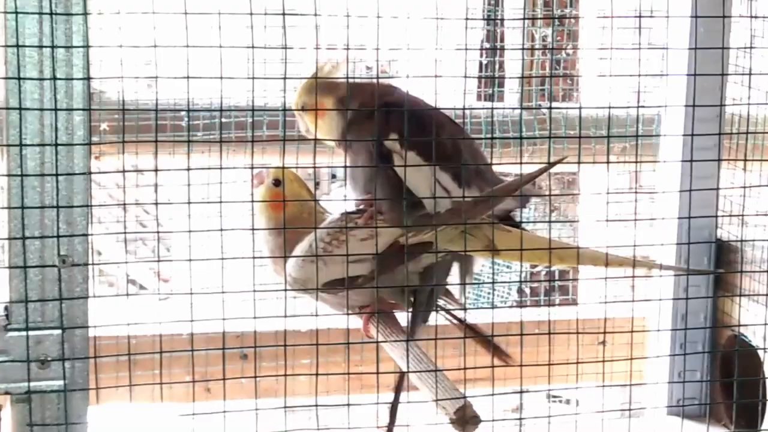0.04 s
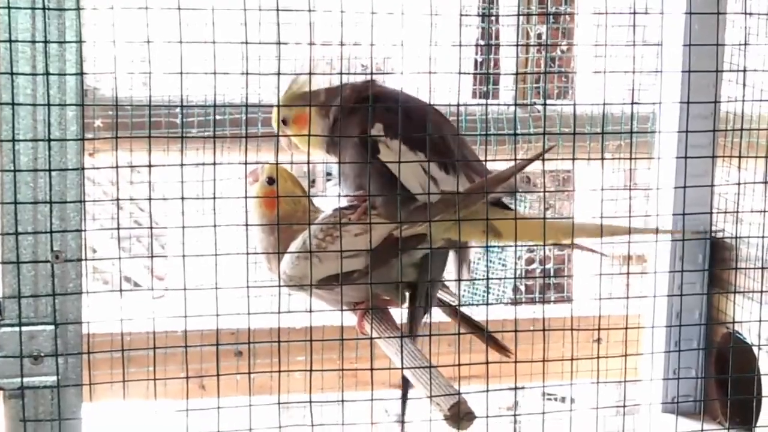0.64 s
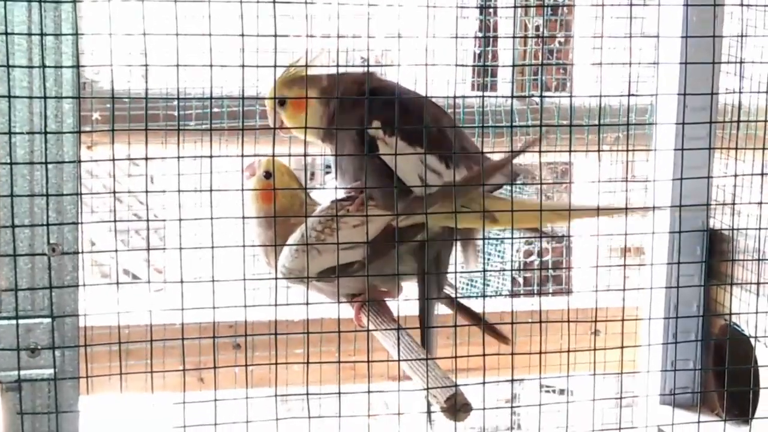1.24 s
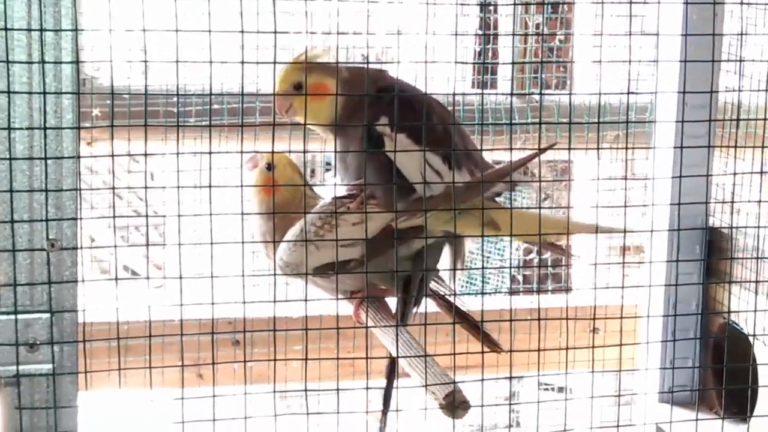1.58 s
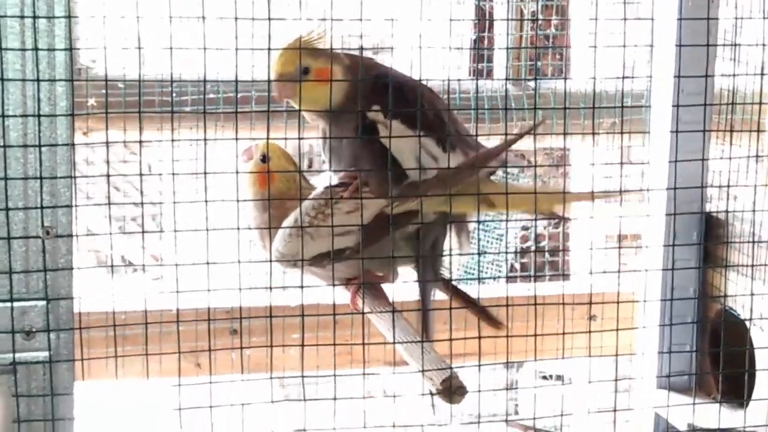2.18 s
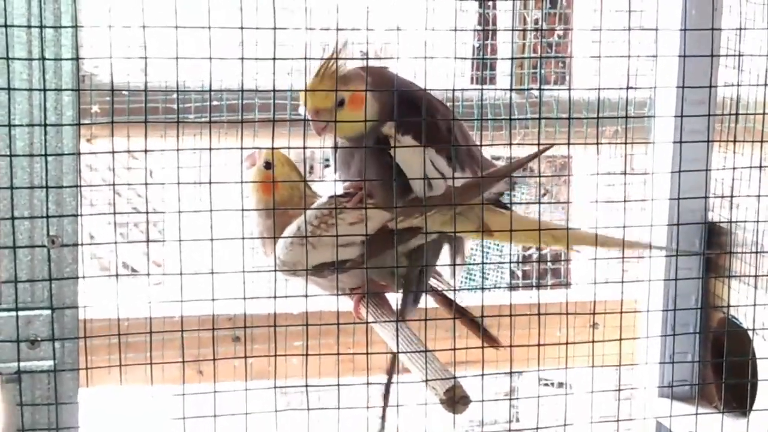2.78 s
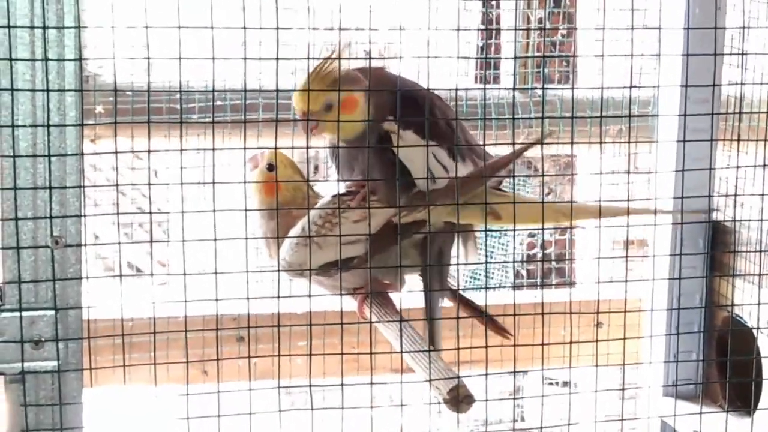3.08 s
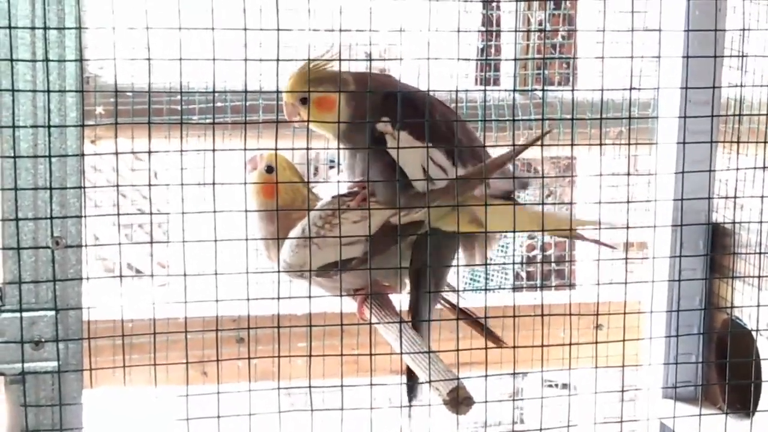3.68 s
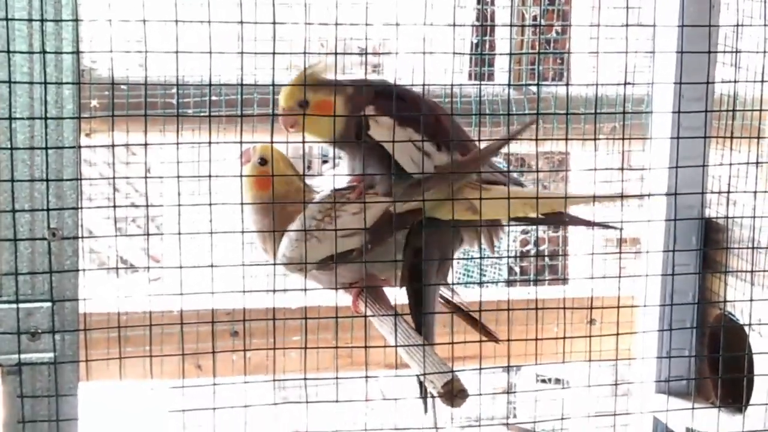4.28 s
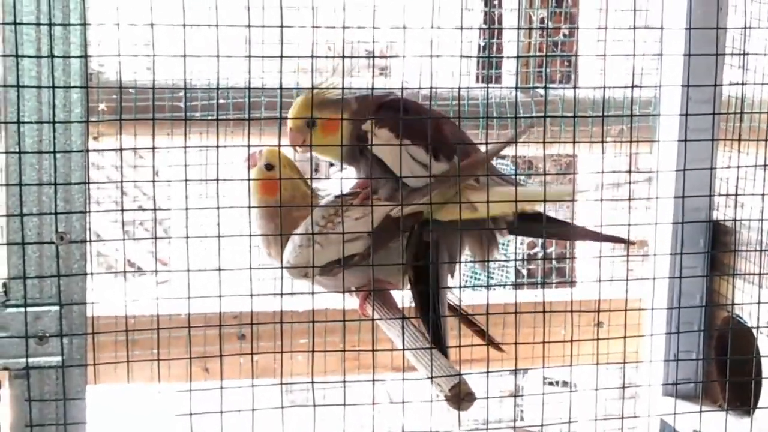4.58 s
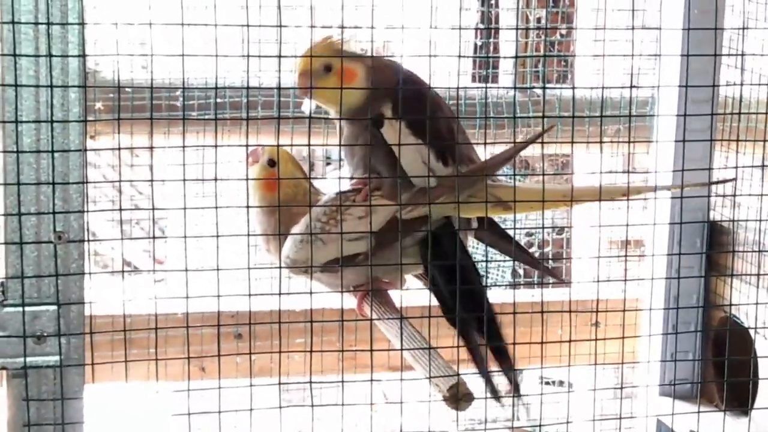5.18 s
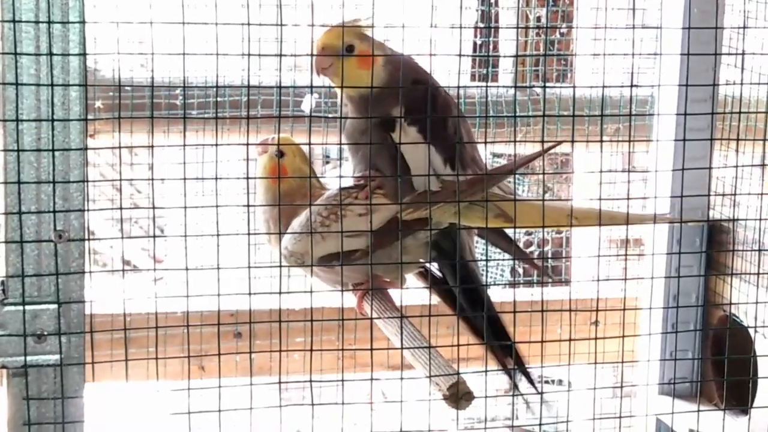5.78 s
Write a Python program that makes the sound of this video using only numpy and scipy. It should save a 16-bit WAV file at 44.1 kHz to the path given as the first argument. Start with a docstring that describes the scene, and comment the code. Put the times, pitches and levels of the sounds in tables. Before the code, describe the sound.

Cockatiels chirp, whine and hiss softly in an aviary, then break into loud whistles and harsh squawks while a distant hen moans.

```python
"""Soft chirps, whines and hisses, then close whistles, a burst of chips and harsh squawks:
cockatiels chattering in a wire aviary, whose hard walls answer each call. Further off a hen
draws out long moans over a faint outdoor rumble. Each voice is a syrinx, a harmonic stack that
shakes as it turns rough; hisses are unvoiced air. A small camera's limiter holds the peaks down."""
import sys
import numpy as np
from scipy import signal
from scipy.fft import rfft, irfft, next_fast_len
from scipy.io import wavfile
from scipy.ndimage import uniform_filter1d, minimum_filter1d, map_coordinates

SR = 44100
rng = np.random.default_rng(int(sys.argv[2]) if len(sys.argv) > 2 else 0)


def write(x):
    x = np.atleast_2d(x).T
    wavfile.write(sys.argv[1], SR, np.round(np.clip(x, -1, 1) * 32767).astype(np.int16))

N = 266364

PROGRESS = np.linspace(0, 1, 41)  # position within a call
# Chirp harmonics, first up: level/dB
CHIRP_HARMONICS_DB = [3.5, 11.5, -16, -21.5, -22, -29, -27.5, -52.5]
# Broadband noise that swells and fades with each call: f/Hz, level/dB
CALL_NOISE_SPECTRUM = [(60, -17), (200, -11.5), (600, -13.5), (1500, -10), (2600, -5.5), (3600, 4),
                       (5200, 1.5), (8000, -9.5), (14000, -14.5)]


def amp(db):
    """Decibels to gain."""
    return 10 ** (np.asarray(db) / 20)


def unit(x):
    """Scale to rms 1."""
    return x / np.sqrt(np.mean(x ** 2) + 1e-20)


def along(points, hz):
    """Read (f/Hz, value) points on a log frequency axis."""
    knots_hz, values = np.transpose(points)
    return np.interp(np.log(hz + 1), np.log(knots_hz + 1), values)


def wobble(rate_hz, n):
    """Smooth random curve of n samples, rate_hz knots a second."""
    knots = rng.standard_normal(int(n * rate_hz / SR) + 4)
    return map_coordinates(knots, [np.arange(n) * rate_hz / SR])


def filtered(x, response):
    """Apply the gain response(hz)."""
    n = x.shape[-1]
    size = next_fast_len(n + 8192)
    return irfft(rfft(x, size) * response(np.fft.rfftfreq(size, 1 / SR)), size)[..., :n]


def noise(spectrum, channels=1):
    """Coloured noise, rms 1."""
    white = rng.standard_normal((channels, N))
    return unit(filtered(white, lambda hz: amp(along(spectrum, hz))))


def spread(pair, coherence):
    """Mix two unrelated signals to left and right of a given coherence."""
    def weights(hz):
        angle = np.arccos(np.clip(along(coherence, hz), -1, 1)) / 2
        return np.array([np.cos(angle), np.sin(angle)])
    mid, side = filtered(pair, weights)
    return np.array([mid + side, mid - side])


def hump(crest, first, top, last):
    """Two half parabolas, first to top to last, joined at crest (0-1)."""
    crest = np.clip(crest, .05, .95)
    away = PROGRESS - crest
    before = (first - top) * (away / crest) ** 2
    after = (last - top) * (away / (1 - crest)) ** 2
    return top + np.where(away < 0, before, after)


def controls(start_s, length_s, *columns):
    """One call as rows of t/s and the given columns."""
    return np.column_stack(np.broadcast_arrays(start_s + length_s * PROGRESS, *columns))


def gesture(rows, fade_s):
    """Sample indices, soft gate and per-sample control curves of one call."""
    times, *columns = np.transpose(rows)
    index = np.arange(max(int((times[0] - fade_s) * SR), 0), min(int((times[-1] + fade_s) * SR), N))
    t = index / SR
    ramp = np.clip(np.minimum(t - times[0], times[-1] - t) / fade_s + 1, 0, 1)
    return index, np.sin(ramp * np.pi / 2) ** 2, [np.interp(t, times, column) for column in columns]


def arch(row, rise_db, fall_db, fray=0, dulling_db=0):
    """Note that bends once, swells and sinks; fray roughens its ends, dulling fades its overtones."""
    start_s, length_s, first_hz, middle_hz, last_hz, crest, db, rough, *colour_db = row
    pitch_hz = np.polyval(np.polyfit([0, .5, 1], [first_hz, middle_hz, last_hz], 2), PROGRESS)
    level_db = db + hump(crest, -rise_db, 0, -fall_db)
    if colour_db:
        colour_db[0] += dulling_db * (.5 - PROGRESS)
    return controls(start_s, length_s, pitch_hz, level_db, rough + hump(crest, fray, 0, fray), *colour_db)


def glide(row, crest, edge_db, rough):
    """Note that slides straight between two pitches."""
    start_s, length_s, first_hz, last_hz, db = row
    pitch_hz = first_hz + (last_hz - first_hz) * PROGRESS
    return controls(start_s, length_s, pitch_hz, db + hump(crest, -edge_db, 0, -edge_db), rough)


def syrinx(calls, harmonics_db, jitter, jitter_hz, flutter_db, flutter_hz, rasp, fade_s):
    """Harmonic stack whose pitch (jitter) and level (flutter) shake with roughness.
    Call rows: t/s, f/Hz, level/dB, roughness/0-1, optionally overtones/dB, undertones/dB."""
    out = np.zeros(N)
    k = np.arange(1, len(harmonics_db) + 1)[:, None]
    strongest = np.argmax(harmonics_db) + 1
    groups = [k > strongest, k < strongest]  # overtones, undertones
    for rows in calls:
        index, gate, (pitch_hz, db, rough, *extra_db) = gesture(rows, fade_s)
        n = len(index)
        rough = np.clip(rough, .15, 1)
        tremble = rough * wobble(jitter_hz, n)
        wander = .55 * np.sqrt(rough) * wobble(jitter_hz / 3, n)
        pitch_hz = pitch_hz * (1 + jitter * (tremble + wander))
        phase = 2 * np.pi * np.cumsum(pitch_hz) / SR
        boost_db = sum(group * extra for group, extra in zip(groups, extra_db))
        strength = amp(np.array(harmonics_db)[:, None] + boost_db) * (k * pitch_hz < SR / 2)
        # Uneven cycles put a noise skirt around each harmonic.
        skirt = np.array([wobble(800, n) + 1j * wobble(800, n) for _ in harmonics_db])
        depth = rasp * rough ** 1.5
        stack = np.sum(strength * np.imag((1 + depth * skirt) * np.exp(1j * k * phase)), axis=0)
        stack /= np.sqrt(.5 + depth ** 2)
        flutter = unit(amp(flutter_db * np.sqrt(rough) * wobble(flutter_hz, n)))
        out[index] += gate * amp(db) * flutter * stack
    return out


def call_noise(call, spectrum, relative_db):
    """Broadband noise that swells and fades with a call."""
    envelope = np.sqrt(np.abs(uniform_filter1d(call ** 2, size=400)))
    return amp(relative_db) * envelope * noise(spectrum)[0]


def aviary(x, walls_db, tail_db):
    """Direct sound, early wall echoes and a short diffuse tail, in stereo."""
    # Tail decay: f/Hz, T60/s
    decay = [(300, 0.91), (1500, 0.29), (4000, 0.21), (7000, 0.2), (14000, 0.29)]
    # Echo likeness, left to right: f/Hz, coherence/0-1
    coherence = [(500, .99), (2000, .98), (4500, .88), (9000, .45), (14000, .3)]
    n = SR // 2
    hz, t, bins = signal.stft(rng.standard_normal((2, n)), SR, nperseg=256)
    bins *= amp(-60 * t / along(decay, hz)[:, None])
    tail = signal.istft(bins, SR, nperseg=256)[1][:, :n]
    tail *= 1 - np.exp(-np.arange(n) / SR / .021)  # 21 ms build-up
    walls = np.zeros((2, n))
    for channel in walls:
        delay_s = rng.uniform(.002, .035, size=30)
        channel[(delay_s * SR).astype(int)] = rng.standard_normal(size=30) * np.exp(-delay_s / .017)
    response = (amp(tail_db) * unit(tail) + amp(walls_db) * unit(walls)) / np.sqrt(n)
    return x + signal.fftconvolve(x[None], spread(response, coherence), axes=1)[:, :N]


def outdoor_air():
    """Faint rumble, gently shifting in level."""
    # Outdoor noise: f/Hz, level/dB
    spectrum = [(15, -24.5), (35, -22), (50, -2), (62, 1), (80, -9), (130, -9.5), (250, -21.5),
                (450, -22.5), (800, -18), (1600, -20), (2700, -23), (4500, -33.5), (7000, -36),
                (14500, -35)]
    # Its likeness, left to right: f/Hz, coherence/0-1
    coherence = [(40, 0.91), (130, 1), (500, 1), (4000, 1), (10000, .6)]
    drift_db = 1.5 * wobble(5, N)
    return amp(-59.5 + drift_db) * spread(noise(spectrum, channels=2), coherence)


def far_birds():
    """Chirps from the aviary's far end, mostly echo."""
    # Chirps: t/s, length/s, first f/Hz, last f/Hz, level/dB
    rows = [ (0.488, 0.031, 1600, 1580, -65), (0.616, 0.03, 1060, 937, -63),
            (1.619, 0.071, 1290, 1000, -55), (1.991, 0.035, 1225, 1217, -57.5),
            (2.099, 0.12, 1283, 1495, -52.5), (4.3, .04, 1442, 1280, -54), (5.208, 0.066, 1494, 1208, -51),
            (5.565, 0.013, 2200, 2043, -60.5)]
    notes = [glide(row, crest=.4, edge_db=1.5, rough=.55) for row in rows]
    calls = syrinx(notes, CHIRP_HARMONICS_DB, jitter=.06, jitter_hz=300,
                   flutter_db=4, flutter_hz=150, rasp=.7, fade_s=.01)
    return amp(-7) * aviary(calls, walls_db=0, tail_db=0)


def moan(curve, tone_shift):
    """Held note that sags, hoarse at both ends, its tone shifting throughout."""
    times, hz, db = np.transpose(curve)
    first_over_db, last_over_db, last_under_db = tone_shift
    length_s = times[-1] - times[0]
    t = times[0] + length_s * PROGRESS
    rough = hump(crest=.6, first=.28, top=.12, last=.3)
    overtones_db = first_over_db + (last_over_db - first_over_db) * PROGRESS
    return controls(times[0], length_s, np.interp(t, times, hz), np.interp(t, times, db),
                    rough, overtones_db, last_under_db * PROGRESS)


def hen():
    """Long, slightly hoarse moans and faint low mutters from the yard."""
    # One curve per moan: t/s, f/Hz, level/dB
    curves = [
        [(1.08, 251, -61), (1.2, 243, -57), (1.4, 244.7, -55), (1.6, 234, -63)],
        [(2.1, 278, -54), (2.2, 297, -46), (2.28, 304, -37), (2.4, 313.6, -33), (2.5, 319.6, -29),
         (2.6, 320.4, -29.5), (2.67, 312, -36), (2.76, 278, -53)],
        [(4.5, 284, -55), (4.6, 307, -53), (4.7, 317, -42), (4.78, 320, -38.5), (4.9, 323, -47),
         (5.0, 324, -50), (5.1, 312, -50), (5.28, 272, -63)],
    ]
    # Tone per moan: first overtones/dB, last overtones/dB, last undertones/dB
    tone_shifts = [(-4, -2, 0), (13, -26, -1.5), (0, 8.5, 16)]
    # Mutters: t/s, length/s, first f/Hz, last f/Hz, level/dB
    mutter_rows = [ (.5, 0.12, 394.4, 389, -59.5), (1.5, 0.088, 457, 405, -54),
                   (1.721, 0.39, 456.5, 400.6, -59.5), (5.282, 0.11, 451, 421, -61.5),
                   (5.439, 0.15, 373.5, 358, -58.5)]
    # Harmonics, first up: level/dB
    moan_harmonics_db = [-44, -19, 0, -12, -8, -10, -23, -24]
    mutter_harmonics_db = [2.5, 2.5, -30, -20]
    # Hoarse noise in the moans: f/Hz, level/dB
    hoarse_spectrum = [(300, -31), (700, -16.5), (1250, 3.5), (1900, -17.5), (2600, -4), (4300, -7),
                       (5600, -17), (8000, -37), (12000, -28.5)]
    moan_notes = [moan(curve, shift) for curve, shift in zip(curves, tone_shifts)]
    mutter_notes = [glide(row, crest=.13, edge_db=5, rough=.4) for row in mutter_rows]
    moans = syrinx(moan_notes, moan_harmonics_db, jitter=.016, jitter_hz=120,
                   flutter_db=3, flutter_hz=50, rasp=.7, fade_s=.03)
    mutters = syrinx(mutter_notes, mutter_harmonics_db, jitter=.06, jitter_hz=150,
                     flutter_db=6, flutter_hz=30, rasp=.4, fade_s=.02)
    yard = amp(-1) * moans + amp(-7.5) * mutters + call_noise(moans, hoarse_spectrum, relative_db=-9)
    return aviary(yard, walls_db=-10, tail_db=-8)


def hisses():
    """Unvoiced air pushed through an open beak."""
    # Hisses: t/s, length/s, crest/0-1, level/dB
    rows = [ (0.391, 0.067, 0.7, -35.5), (1.245, 0.058, 0.54, -67), (2.511, 0.054, 0.84, -37),
            (3.17, 0.081, 0.79, -34.5), (5.304, 0.017, 0.29, -58), (5.866, 0.018, 0.29, -30.5)]
    # Beak noise: f/Hz, level/dB
    spectrum = [(590, -77), (1000, -59), (2040, -44), (2160, -20.5), (3140, -14.5), (4120, -5.5),
                (5660, -13.5), (12200, -32), (14500, -40), (15000, -74)]
    envelope = np.zeros(N)
    for start_s, length_s, crest, top_db in rows:
        swell_db = top_db + hump(crest, first=-13, top=0, last=-4)
        index, gate, (db,) = gesture(controls(start_s, length_s, swell_db), fade_s=.018)
        envelope[index] += gate * amp(db)
    return envelope * noise(spectrum)[0]


def peeps():
    """Low, nearly pure notes; one is long and wavers."""
    # Peeps: t/s, length/s, first, middle, last f/Hz, crest/0-1, level/dB, roughness/0-1
    rows = [ (0.688, 0.076, 1633, 1556, 1560, 0.47, -31, 0.26),
            (1.812, 0.1, 1662, 1660, 1543, 0.19, -36, 0.34),
            (2.926, 0.068, 1533, 1600, 1711, 0.28, -30.5, 0.36),
            (3.744, 0.006, 1425, 1574, 1575, .2, -37.5, .3),
            (3.937, 0.064, 1560, 1601, 1562, 0.83, -29, 0.25),
            (4.925, .06, 1564, 1547, 1678, 0.45, -28, 0.36),
            (5.951, 0.11, 1566, 1585, 1610, 0.59, -34.5, 0.45)]
    # Long peep: t/s, f/Hz, level/dB
    long_peep = [(4.42, 1660, -44), (4.434, 1725, -30), (4.458, 1782, -30), (4.508, 2133, -23.5),
                 (4.516, 2118, -29), (4.546, 2053, -23), (4.584, 1948, -24), (4.63, 2152, -26.5),
                 (4.675, 2164, -40)]
    # Harmonics, first up: level/dB
    harmonics_db = [0, -24, -48]
    notes = [arch(row, rise_db=6.5, fall_db=6.5) for row in rows]
    notes.append([(t, hz, db - 2, .16) for t, hz, db in long_peep])
    return syrinx(notes, harmonics_db, jitter=.1, jitter_hz=450,
                  flutter_db=5, flutter_hz=200, rasp=.8, fade_s=.01)


def whines():
    """Thin notes led by the second harmonic."""
    # Whines: t/s, length/s, first, middle, last f/Hz, crest/0-1, level/dB, roughness/0-1, overtones/dB
    rows = [ (0.124, 0.14, 1576, 1512, 1227, .55, -36.5, .2, -2.5),
            (1.043, 0.026, 1512, 1514, 1480, .3, -36.5, .1, 1.5),
            (1.094, 0.068, 1510, 1544, 1483, .4, -36.5, .12, -4.5),
            (1.177, 0.074, 1500, 1460, 1404, 0.12, -34, .1, -9.5),
            (1.421, .1, 1342, 1619, 1540, .75, -33.5, 0.36, 0.5),
            (1.531, 0.098, 1500, 1510, 1544, .3, -35, .55, -14),
            (1.719, 0.05, 1400, 1577, 1530, .3, -45, .3, -22),
            (1.798, .047, 1540, 1570, 1660, 0.38, -27.5, .15, -11),
            (1.844, 0.085, 1625, 1819, 1432, .35, -29.5, 0.37, -2.5),
            (2.686, 0.071, 1890, 1904, 1882, .35, -31.5, .1, -2),
            (3.005, 0.28, 1866, 1904, 1966, .72, -32, .2, -1.5),
            (3.445, 0.058, 1570, 1764, 1690, .45, -31.5, .2, -2),
            (3.527, 0.07, 1467, 1661, 1870, .45, -31, .3, -1),
            (4.42, 0.056, 1634, 1773, 1920, .4, -37, 0.53, -11),
            (4.565, 0.03, 1480, 1507, 1480, .5, -38.5, 0.32, -17)]
    # Harmonics, first up: level/dB
    harmonics_db = [-18, 6.5, -11.5, -12, -44, -22.5, -24, -22]
    notes = [arch(row, rise_db=7, fall_db=7.5, dulling_db=2.5) for row in rows]
    return syrinx(notes, harmonics_db, jitter=.07, jitter_hz=450,
                  flutter_db=5.5, flutter_hz=170, rasp=1.1, fade_s=.008)


def chirps():
    """Short soft notes that dull as they go."""
    # Chirps: t/s, length/s, first, middle, last f/Hz, crest/0-1, level/dB, roughness/0-1,
    # overtones/dB, undertones/dB
    rows = [ (.055, .024, 1670, 1713, 1820, 0.6, -58.5, 0.55, 19, 14),
            (.083, 0.057, 1974, 2202, 2297, 0.44, -42.5, 1, 8, 12.5),
            (0.279, 0.082, 1455, 1728, 1770, 0.18, -51, 1, 10.5, 10.5),
            (0.651, 0.11, 1653, 1977, 2020, .8, -43.5, 0.24, 16.5, 7),
            (.765, 0.083, 2044, 2142, 1850, 0.1, -42, 0.87, -4, 12),
            (.972, 0.047, 2090, 2104, 2176, 0.94, -38.5, 0.8, 4, -5),
            (1.018, 0.081, 2274, 2390, 2255, 0.17, -42, 0.61, 4, 2.5),
            (1.366, 0.12, 1758, 2054, 2130, 0.46, -39, 0.86, 4.5, 7),
            (1.46, 0.072, 2126, 1932, 1800, 0.19, -35, 0.62, -8, 2),
            (1.525, 0.086, 1880, 2089, 1775, 0.3, -34, 0.6, -10, -1),
            (1.76, 0.025, 2080, 2100, 2170, .6, -43.5, 0.42, 4, 3),
            (1.784, 0.016, 2150, 2316, 2460, 0.42, -38, .45, 9.5, 9),
            (2.905, 0.1, 2350, 2072, 1827, 0.048, -35.5, 0.97, -10, 9),
            (3.001, 0.0522, 1847, 2000, 2075, 0.92, -35, 0.99, -17, 5.5),
            (3.334, 0.065, 1818, 1822, 1633, 0.26, -40.5, .25, 17, -5.5),
            (3.399, 0.051, 1892, 2148, 2333, 0.42, -38.5, 1, 12, 1.5),
            (3.485, 0.04, 2340, 2190, 2080, 0.23, -38.5, 0.46, -6, -25),
            (3.561, 0.04, 2484, 2158, 1990, 0.82, -29, 0.42, 3, -5)]
    notes = [arch(row, rise_db=10.5, fall_db=7, dulling_db=8) for row in rows]
    return syrinx(notes, CHIRP_HARMONICS_DB, jitter=.06, jitter_hz=400,
                  flutter_db=3.5, flutter_hz=200, rasp=.55, fade_s=.005)


def soft_birds():
    """Quiet chatter around the aviary, rich in echoes."""
    chatter = amp(-6.5) * chirps() + amp(-6) * whines() + amp(.5) * peeps() + amp(1) * hisses()
    broadband = call_noise(chatter, CALL_NOISE_SPECTRUM, relative_db=-24)
    return aviary(chatter + broadband, walls_db=-1, tail_db=-7)


def squeaks():
    """Low-register slides at the edges of the chips."""
    # Squeaks: t/s, length/s, first f/Hz, last f/Hz, level/dB
    rows = [ (3.76, 0.007, 2170, 2900, -29), (3.783, 0.0052, 2960, 3760, -13.5),
            (3.869, 0.014, 2244, 3690, -22.5), (3.977, 0.0089, 2290, 3170, -34.5),
            (4.085, .022, 2546, 3680, -23.5), (4.12, 0.03, 3400, 3100, -27),
            (4.188, 0.012, 2840, 3300, -26)]
    # Harmonics, first up: level/dB
    harmonics_db = [-4.5, -0.5, -10.5, -12, -9]
    notes = [glide(row, crest=.65, edge_db=3.5, rough=.61) for row in rows]
    return syrinx(notes, harmonics_db, jitter=.1, jitter_hz=700,
                  flutter_db=5, flutter_hz=400, rasp=1.1, fade_s=.0015)


def rasps():
    """Low, rough notes into which the whistles break."""
    # Rasps: t/s, length/s, first, middle, last f/Hz, crest/0-1, level/dB, roughness/0-1, overtones/dB
    rows = [ (2.396, 0.093, 1049, 1064, 1089, 0.24, -56, 0.22, 22),
            (2.785, 0.1287, 1325, 1385, 1348, 1, -30, 0.67, -4),
            (5.039, .075, 1228, 1412, 1391, 0.94, -32.5, .75, 2.5),
            (5.108, .064, 1495, 1337, 1089, 0.46, -32, .6, 5.5)]
    # Harmonics, first up: level/dB
    harmonics_db = [-17, 0.5, 7.5, -1.5, -14.5, -17, -16.5, -14.5, -27, -23.5]
    notes = [arch(row, rise_db=15, fall_db=12, dulling_db=.5) for row in rows]
    return syrinx(notes, harmonics_db, jitter=.05, jitter_hz=400,
                  flutter_db=3, flutter_hz=250, rasp=.8, fade_s=.01)


def whistles():
    """Loud high notes that fray at their weak ends."""
    # Whistles: t/s, length/s, first, middle, last f/Hz, crest/0-1, level/dB, roughness/0-1, overtones/dB
    rows = [ (2.36, 0.053, 4070, 4336, 3970, 0.13, -20.5, .38, 4),
            (2.42, 0.096, 4120, 4180, 4140, .4, -30, 0.8, -14),
            (2.768, 0.0263, 3494, 3700, 4100, 0.26, -26.5, 0.86, 2),
            (2.8, .113, 4104, 4220, 3862, 0.42, -15, 0.64, -1),
            (4.366, .052, 4510, 4900, 4350, .25, -7, 0.34, -6),
            (4.42, 0.021, 4450, 4360, 4250, 0.22, -21.5, .55, 0.5),
            (4.468, 0.085, 4330, 4464, 4573, .62, -13, 0.092, -8.5),
            (4.879, .022, 4320, 4290, 4440, .4, -19, .4, -6.5),
            (4.905, 0.11, 4426, 4568, 4383, 0.8, -7.5, .1, -7.5),
            (5.008, .02, 4310, 4306, 4290, 0.37, -5.5, 0.13, -5.5),
            (5.029, 0.058, 4330, 4606, 4207, 0.22, -15, 0.99, 1)]
    # Harmonics, first up: level/dB
    harmonics_db = [0, -19, -24]
    notes = [arch(row, rise_db=12, fall_db=5.5, fray=.43, dulling_db=5) for row in rows]
    return syrinx(notes, harmonics_db, jitter=.028, jitter_hz=600,
                  flutter_db=5.5, flutter_hz=280, rasp=.6, fade_s=.003)


def chips():
    """Each chip runs unbroken from a scrape to a low note, then leaps to the upper register."""
    # Chips: t/s, scrape, low, high length/s, low, high f/Hz, scrape, low, high level/dB, roughness/0-1
    rows = [ (3.759, 0.011, 0.024, 0.013, 4666, 7250, -19.5, -9, -14.5, 0.31),
            (3.868, .013, 0.014, 0.0211, 4745, 7410, -15.5, -6, -14.5, 0.47),
            (3.972, .012, 0.02, 0.028, 4692, 7170, -18, -5.5, -14, 0.42),
            (4.08, .007, .019, 0.024, 5690, 6070, -30, -14.5, -10, .7),
            (4.189, .015, 0.018, 0.031, 5285, 6800, -16.5, -8, -13, .33)]
    # Harmonics, first up: level/dB
    harmonics_db = [0, -18, -19]
    scrape_hz, scrape_rough = 5400, .9
    scrape_over_db, low_over_db, high_over_db = -4, -4.5, 4.5
    low_bend, high_bend = np.array([1.05, .99, 1.08]), np.array([.94, .99, .93])  # dip, arch
    low_crest, high_crest = .3, .45
    notes = []
    for start_s, scrape_s, low_s, high_s, low_hz, high_hz, scrape_db, low_db, high_db, rough in rows:
        scrape = controls(start_s, scrape_s, scrape_hz, scrape_db, scrape_rough, scrape_over_db)
        onset_s = start_s + scrape_s
        low = (onset_s, low_s, *low_hz * low_bend, low_crest, low_db, rough, low_over_db)
        high = (onset_s + low_s, high_s, *high_hz * high_bend, high_crest, high_db, rough, high_over_db)
        tones = [arch(row, rise_db=7, fall_db=7, fray=.3) for row in (low, high)]
        notes.append(np.vstack([scrape] + tones))
    return syrinx(notes, harmonics_db, jitter=.065, jitter_hz=700,
                  flutter_db=3.5, flutter_hz=350, rasp=.9, fade_s=.002)


def squawks():
    """A clear start breaks into an uneven rattle that swings pitch against level."""
    # One curve per squawk: t/s, second harmonic f/Hz, level/dB
    curves = [
        [(5.646, 5660, -22.5), (5.655, 5250, -16.5), (5.664, 4550, -15), (5.677, 4970, -16.5),
         (5.692, 5110, -12.5), (5.714, 4855, -6.5), (5.744, 5210, -12), (5.755, 4750, -14.5),
         (5.768, 4550, -22)],
        [(5.879, 5290, -17), (5.886, 5046, -15), (5.898, 5280, -13.5), (5.938, 5615, -13), (5.951, 6440, -12.5),
         (5.963, 5435, -19.5), (5.98, 5330, -10.5), (5.989, 4500, -23)],
    ]
    # Harmonics, first up: level/dB
    harmonics_db = [-14, 0.5, -15.5, -19.5, -18, -42]
    clear_s, rattle_hz, rattle_db, pitch_swing, overtones_db = .0458, 85.6, 3.5, .08, -1.5
    notes = []
    for curve in curves:
        times, second_hz, db = np.transpose(curve)
        t = np.arange(times[0], times[-1], 1 / SR)
        broken = np.clip((t - times[0] - clear_s) / .008, 0, 1)
        beats = np.cumsum(rattle_hz * np.exp(.2 * wobble(rattle_hz, len(t)))) / SR
        rattle = broken * signal.sawtooth(2 * np.pi * beats, width=.25)
        pitch_hz = np.interp(t, times, second_hz) / 2 * (1 + pitch_swing * rattle)
        level_db = np.interp(t, times, db) - rattle_db * rattle
        rough = .22 + .4 * broken
        notes.append(np.column_stack([t, pitch_hz, level_db, rough, np.full(len(t), overtones_db)]))
    return syrinx(notes, harmonics_db, jitter=.066, jitter_hz=470,
                  flutter_db=4.5, flutter_hz=320, rasp=.8, fade_s=.003)


def loud_birds():
    """Close calls, mostly direct sound; broadband noise swells and fades with them."""
    whistle, rasp, squawk, chip = whistles(), rasps(), squawks(), chips()
    calls = amp(-.5) * (whistle + chip) + amp(8.5) * rasp + amp(1) * squawk + amp(2) * squeaks()
    broadband = call_noise(chip, CALL_NOISE_SPECTRUM, relative_db=-16)
    broadband += call_noise(squawk + rasp, CALL_NOISE_SPECTRUM, relative_db=-16)
    broadband += call_noise(whistle, CALL_NOISE_SPECTRUM, relative_db=-29)
    return aviary(calls + broadband, walls_db=-7, tail_db=-14)


def scene():
    """Birds slightly to the right, over outdoor air."""
    birds = soft_birds() + far_birds() + loud_birds() + hen()
    return birds * amp([[-.5], [.5]]) + outdoor_air()


def record(dry):
    """The camera's fast limiter, then its steep band limit."""
    ceiling_db, top_hz = -2.5, 14700
    peak = np.abs(dry).max(axis=0)
    needed = np.minimum(1, amp(ceiling_db) / (peak + 1e-9))
    gain = uniform_filter1d(minimum_filter1d(needed, size=120), size=100)
    return filtered(dry * gain, lambda hz: 1 / np.sqrt(1 + (hz / top_hz) ** 160))


dry = scene()
out = record(dry)
write(out)
```